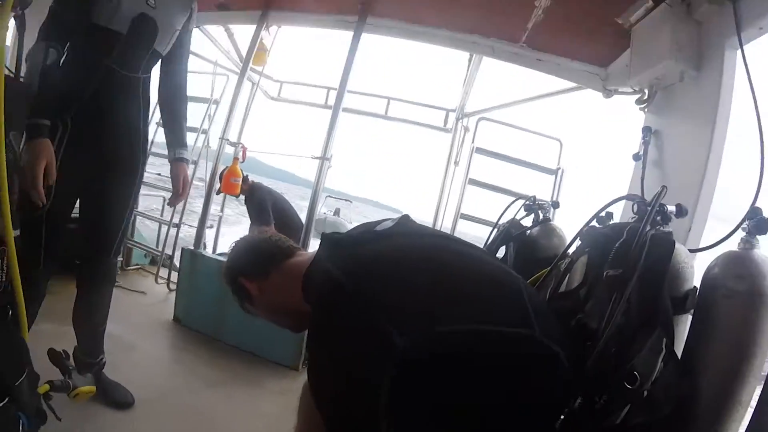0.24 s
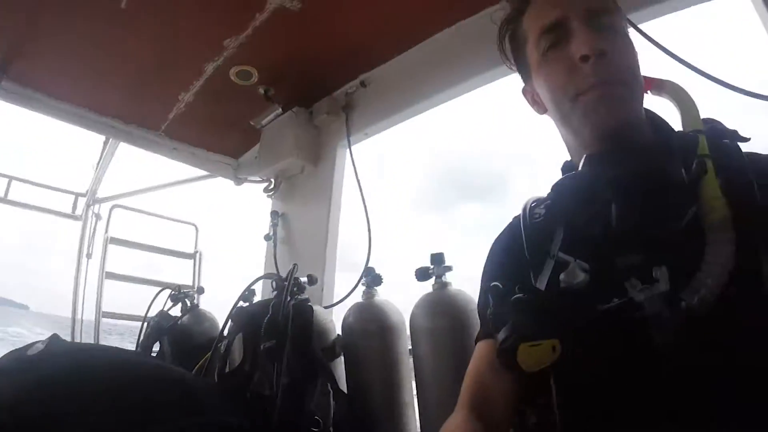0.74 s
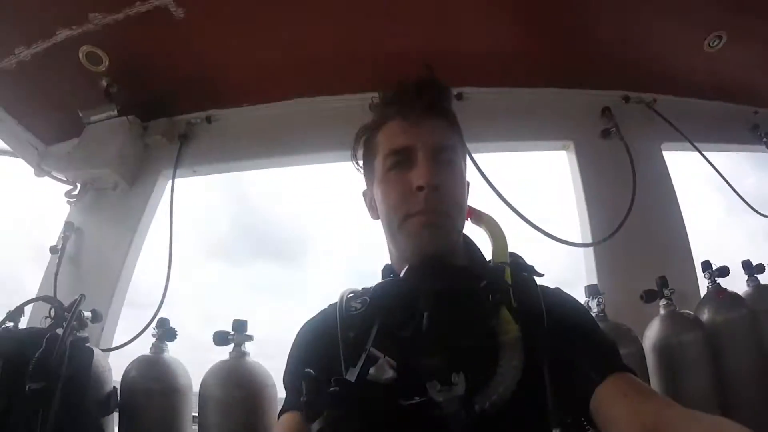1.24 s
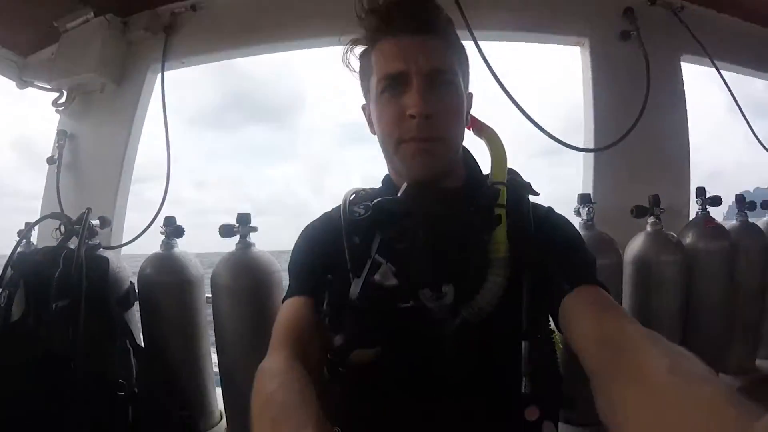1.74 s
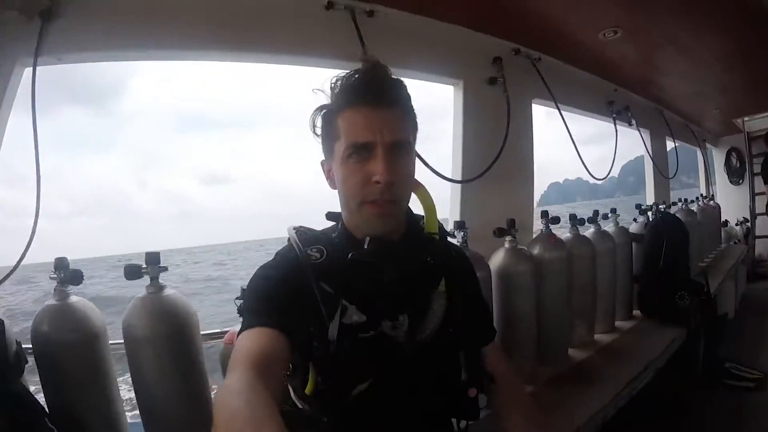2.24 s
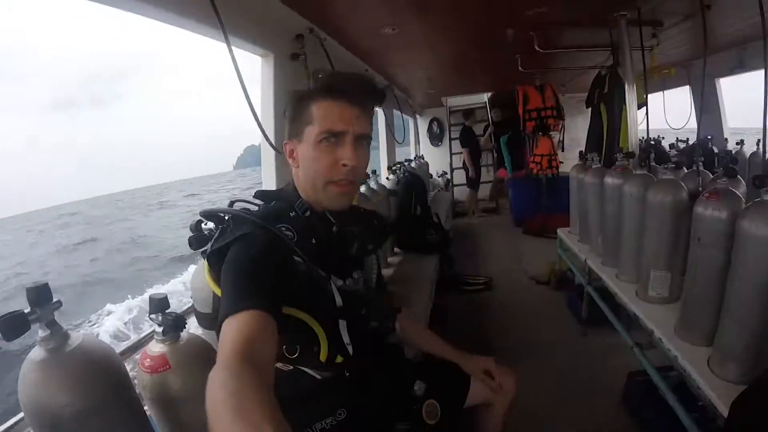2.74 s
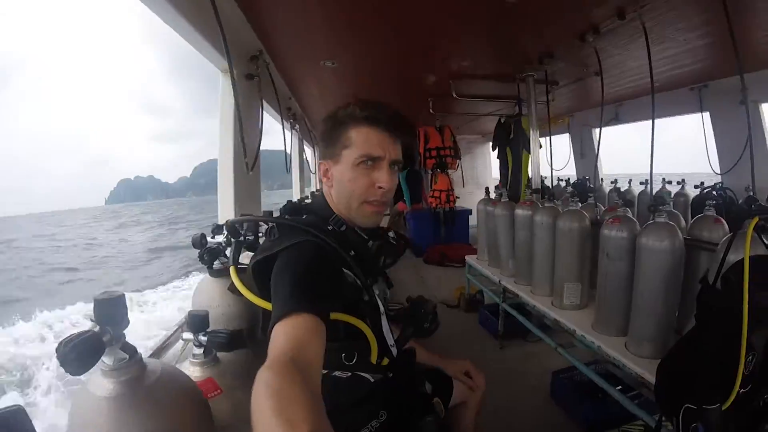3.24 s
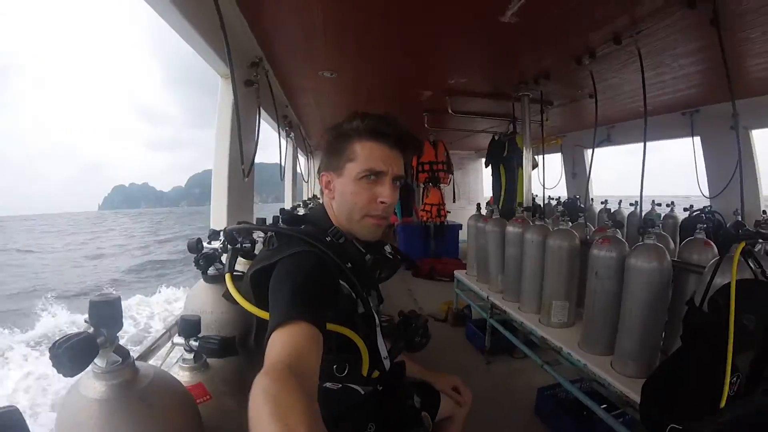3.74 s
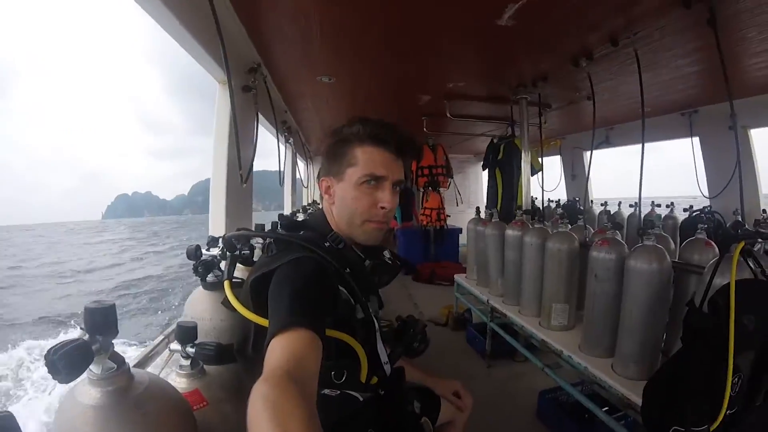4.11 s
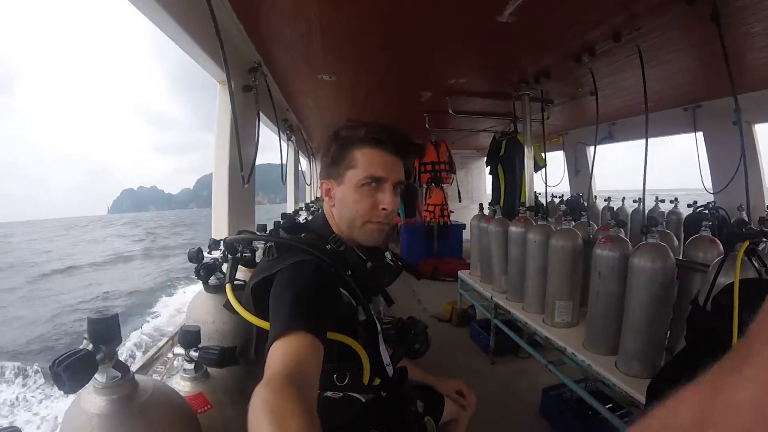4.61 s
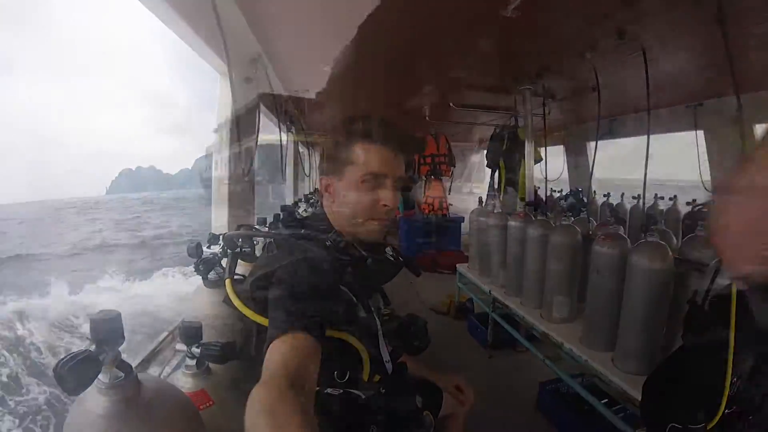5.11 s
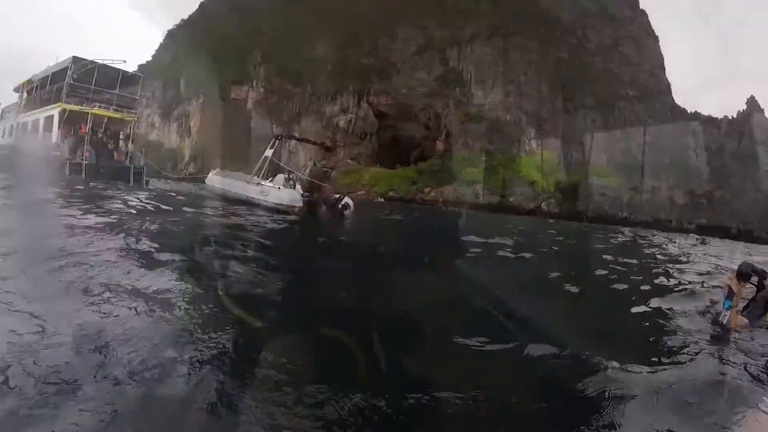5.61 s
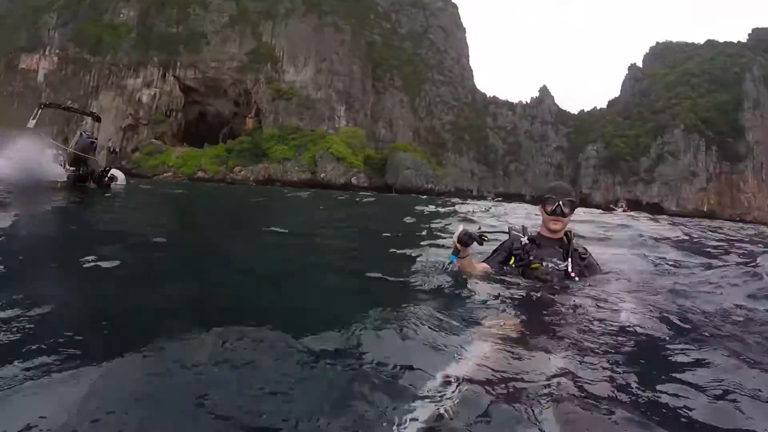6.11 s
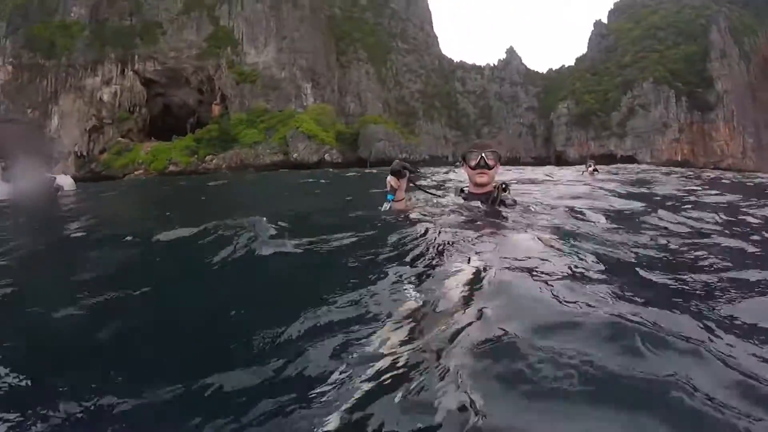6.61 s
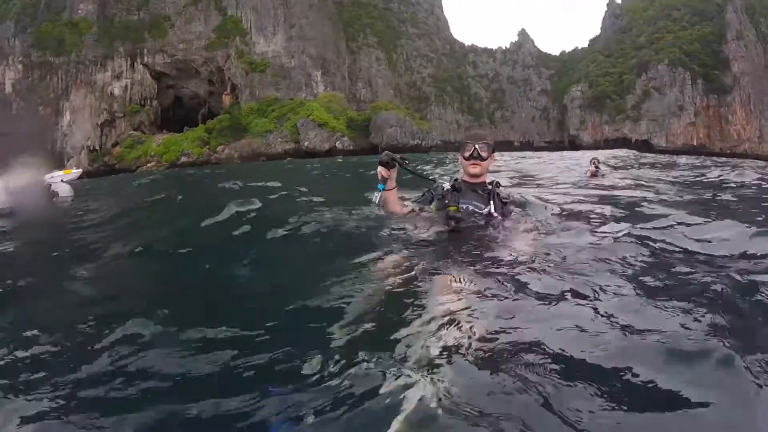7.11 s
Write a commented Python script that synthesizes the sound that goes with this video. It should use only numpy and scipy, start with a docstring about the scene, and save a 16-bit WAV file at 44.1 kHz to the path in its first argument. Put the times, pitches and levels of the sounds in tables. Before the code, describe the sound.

Muffled, close perspective from inside a sealed camera housing. Engine and propeller hum beat together with boomy hull vibration, clatter and foamy hiss. Loud low handling bumps, dry creaks, snaps and skin rubbing dominate early on, pushing the boat down in level. Afterwards the engine swells back, wavering, with soft knocks and a brief spray wash. It dissolves into a much quieter calm sea, with light fizzing ripples, low sloshes, tiny bubbles and plops.

```python
"""On the deck of a dive boat under way, heard from inside a camera's waterproof case.
Harmonics of the diesel and the propeller beat together, hull and panels shake in step with the shaft,
and the wake hisses as grainy filtered noise. A hand shifts its grip on the case: dull pushes, damped clicks
and snaps, rubbing noise and sticky pressure steps. The boat fades away and the camera floats on a calm sea,
where ripples and laps are swelling noise, and drips and bubbles are damped rings of rising pitch."""
import sys
import numpy as np
from scipy import signal
from scipy.fft import rfft, irfft, next_fast_len
from scipy.io import wavfile
from scipy.ndimage import map_coordinates

SR = 44100
rng = np.random.default_rng(int(sys.argv[2]) if len(sys.argv) > 2 else 0)


def dump_mix(stems):
    """Bounce the given channels to the path in sys.argv[1] as a 16-bit WAV at rate SR."""
    frames = np.atleast_2d(stems).T  # one column per channel
    limited = np.clip(frames, -1, 1)  # hard clip at full scale
    pcm = np.round(limited * 32767).astype(np.int16)
    wavfile.write(sys.argv[1], SR, pcm)


N = 324135
T = np.arange(N) / SR


def amp(db):
    """Decibels to gain."""
    return 10 ** (np.asarray(db) / 20)


def unit(x):
    """Scale to rms 1."""
    return x / np.sqrt(np.mean(x ** 2) + 1e-20)


def curve(rows):
    """A (time, value) table joined by straight lines, one value per sample."""
    return np.interp(T, *np.transpose(rows))


def wobble(rate):
    """A smooth random curve, rate knots a second."""
    return map_coordinates(rng.standard_normal(4096), [T * rate], mode="wrap")


def filtered(x, response):
    """x times a response of frequency."""
    m = next_fast_len(N + SR // 2)
    return irfft(rfft(x, m) * response(np.fft.rfftfreq(m, 1 / SR)), m)[:N]


def shaped(x, spectrum):
    """x through a (Hz, dB) spectrum, interpolated along log frequency."""
    f, db = np.transpose(spectrum)
    return filtered(x, lambda hz: amp(np.interp(np.log(hz + 1), np.log(f + 1), db)))


def coloured(x, spectrum):
    """x through a (Hz, dB) spectrum, at rms 1."""
    return unit(shaped(x, spectrum))


def noise(spectrum):
    """Fresh noise of that spectrum, at rms 1."""
    return coloured(rng.standard_normal(N), spectrum)


def grains(per_second):
    """Sparse impulses of random size, at rms 1."""
    return unit((rng.random(N) < per_second / SR) * rng.standard_normal(N))


def swell(s, half):
    """A bell-shaped stroke round time s."""
    return np.exp(-.5 * ((T - s) / half) ** 2)


def held(start, end, rise, release):
    """Rise from start, hold until end, release."""
    return np.clip(np.minimum((T - start) / rise, 1 - (T - end) / release), 0, 1)


def add(track, s, sound):
    """Mix a sound into the track at time s."""
    part = track[max(round(s * SR), 0):][:len(sound)]
    part += sound[:len(part)]


def rings(rows, attack, glide, dull_hz=5500):
    """Damped rings (s, peak dB, start Hz, t60, share of dull noise); attack in cycles, glide raises the pitch."""
    track, t = np.zeros(N), np.arange(SR // 4) / SR
    for s, db, hz, t60, crack in rows:
        fade = amp(-60 * t / t60)
        ring = np.sin(2 * np.pi * hz * t * (1 + glide * t / t60))
        dull = signal.butter(3, min(2.2 * hz, dull_hz), fs=SR)
        burst = unit(signal.lfilter(*dull, rng.standard_normal(len(t))))
        sound = (ring + crack * burst) * fade * (1 - np.exp(-t * hz / attack))
        add(track, s, amp(db) * sound / np.abs(sound).max())
    return track


def lines(turns, orders, low_db, high_db, waver_db):
    """Harmonics of a rotation (multiples 1-3 on low_db, the rest on high_db), wavering as the deck's echoes shift."""
    tone = np.zeros(N)
    for k, db in orders:
        level = high_db if k > 3.5 else low_db
        waver = waver_db * np.log(k) * (1.1 * wobble(3.08) + wobble(15))
        phase = k * turns + (k > 2) * rng.random()
        tone += np.sqrt(2) * amp(level + db + waver) * np.cos(2 * np.pi * phase)
    return tone


def shaken(shaft, spectrum, loose_db):
    """The same jolts return on every turn of the shaft: a comb of close lines, plus loose rattle."""
    jolts = map_coordinates(rng.standard_normal(2048), [shaft % 1 * 2048], mode="grid-wrap")
    return unit(coloured(jolts, spectrum) + amp(loose_db) * noise(spectrum))


FADE_END_S, FADE_S, FADE_POWER = 5.867, 0.81, 0.78


def under_way():
    """Gain of the boat as it fades into the calm sea."""
    return np.clip((FADE_END_S - T) / FADE_S, 0, 1) ** FADE_POWER


DIP_S, DIP_END_S, DIP_FALL_S, DIP_RETURN_S = 1.105, 1.95, 0.054, 0.66


def gripped():
    """1 while the hand holds the case tightly."""
    return held(DIP_S, DIP_END_S, DIP_FALL_S, DIP_RETURN_S)


# the boat sounds fainter during the tight grip, its bass fainter still
DIP_DB, DIP_BASS_DB = -11.5, -1.5
# the engine's firing rate as the boat runs: [time_s, rate_hz]
FIRING_RATE = [(0, 59.3), (2.3, 58.7), (4.2, 58.5)]


def boat():
    """Engine, propeller, hull and wake run off one rotation, dip with the tight grip and fade away."""
    firings = np.cumsum(curve(FIRING_RATE) * (1 + 0.001638 * wobble(8))) / SR
    # firing and blade tones swell when they fall into step, as they do here
    firings -= np.interp(4.14, T, firings)
    shaft = firings * 2 / 15  # two turns in 15 firings
    blades = 7 * shaft
    bass = engine(firings) + propeller(blades) + hull(shaft, firings) + panels(shaft) + knocks()
    bass *= amp(DIP_BASS_DB * gripped())
    treble = wake(firings) + clatter(shaft) + whine(shaft) + bow_wave()
    return (bass + treble) * amp(DIP_DB * gripped()) * under_way()


# exhaust tones: [multiple of the firing rate, level_db on top of the low curve, or of the high one from 4 up]
FIRING_TONES = [(1, -1), (2, -10), (4, -6.5), (5, -17.5), (6, -23), (7, -30.5), (9, -31.5)]
# standing waves favour different firing tones from moment to moment, here the lowest: [time_s, level_db]
FIRING_LOW_LEVEL = [(0, -24), (.9, -26.5), (2.85, -24.5), (3.3, -27.5), (5.1, -26)]
# the same for the third firing tone: [time_s, level_db]
FIRING_THIRD_LEVEL = [(0, -30), (.5, -33.5), (1.0, -37.5), (2.15, -40), (2.45, -34), (2.8, -31.5),
                      (3.1, -41), (3.6, -36), (4.2, -35), (4.7, -35.5), (5.1, -44), (5.6, -35.5)]
# the same for the firing tones from the fourth up: [time_s, level_db]
FIRING_HIGH_LEVEL = [(0, -35), (.9, -40), (3.1, -43.5), (3.4, -29), (3.75, -27), (4.05, -36.5), (4.4, -25),
                     (5, -29.5)]


def engine(firings):
    """The diesel sounds harmonics of its firing rate; no two firings are equally strong."""
    uneven = amp(1.1 * wobble(24) + 1.2 * wobble(55))
    third = np.sqrt(2) * amp(curve(FIRING_THIRD_LEVEL)) * np.cos(2 * np.pi * 3 * firings)
    low_db, high_db = curve(FIRING_LOW_LEVEL), curve(FIRING_HIGH_LEVEL)
    return uneven * (third + lines(firings, FIRING_TONES, low_db, high_db, waver_db=1.0))


THROB_DB = -8.5  # lowest blade tone, relative to the low firing curve
# propeller tones: [multiple of the blade rate, level_db on top of the low curve, or of the high one from 4 up]
BLADE_TONES = [(2, 0), (3, -25.5), (4, -12.5), (5, -7), (6, -17.5), (7, -19), (8, -33)]
# standing waves on the second and third blade tones: [time_s, level_db]
BLADES_LOW_LEVEL = [(0, -43), (2.5, -36), (3.75, -33), (4.1, -23), (5, -27.5)]
# standing waves on the blade tones from the fourth up: [time_s, level_db]
BLADES_HIGH_LEVEL = [(0, -54), (2.3, -40), (2.65, -31), (3.05, -26), (3.35, -36), (3.7, -43), (4.15, -42),
                     (4.35, -32.5), (5.1, -30)]


def propeller(blades):
    """Blade harmonics; the lowest lies just under the firing tone and beats with it four times a second."""
    low_db, high_db = curve(BLADES_LOW_LEVEL), curve(BLADES_HIGH_LEVEL)
    upper = amp(0.58 * wobble(12)) * lines(blades, BLADE_TONES, low_db, high_db, waver_db=0.84)
    throb_db = curve(FIRING_LOW_LEVEL) + THROB_DB
    return upper + amp(throb_db) * np.sqrt(2) * np.cos(2 * np.pi * blades)


BOOM_DB, DRONE_DB = -35, -53  # steady levels under way
# the hull surges as it meets a wave: [middle_s, half_length_s, boom_db, panel_drone_db]
SURGES = [(0.32, 0.12, -38.5, -42.5), (3.052, 0.17, -43, -50), (3.228, 0.041, -49, -39.5),
          (4.466, 0.25, -43, -64), (5.083, 0.24, -40, -52.5)]
# colour of the hull's boom: [freq_hz, level_db per Hz]
BOOM_SPECTRUM = [(10, -29), (25, -17), (45, 7.5), (80, 7.5), (140, 7.5), (205, 1.5), (255, 7), (305, 4.5),
                 (340, -3.5), (400, -17), (700, -59), (1500, -120)]


def hull(shaft, firings):
    """The hull booms in step with the shaft, flutters with each firing and surges on the waves."""
    boom = amp(BOOM_DB) + sum(amp(db) * swell(s, half) for s, half, db, _ in SURGES)
    flutter = amp(1.0 * wobble(7) + 2 * wobble(30) + 2.5 * np.cos(2 * np.pi * firings))
    return boom * flutter * shaken(shaft, BOOM_SPECTRUM, loose_db=-1.5)


# colour of the panels' drone: [freq_hz, level_db per Hz]
PANEL_SPECTRUM = [(100, -61.5), (280, -7.5), (350, -1), (410, 7.5), (450, -8.5), (520, -3), (620, -5.5),
                  (800, -28), (1500, -53), (3000, -120)]


def panels(shaft):
    """Panels drone over the boom, shaken by the shaft and mostly loose rattle."""
    drone = amp(DRONE_DB) + sum(amp(db) * swell(s, half) for s, half, _, db in SURGES)
    return drone * amp(1.4 * wobble(14)) * shaken(shaft, PANEL_SPECTRUM, loose_db=7.5)


WAKE_DB = -43
# colour of the wake's foam: [freq_hz, level_db per Hz]
FOAM_SPECTRUM = [(150, -20.5), (450, 3), (750, 1), (1350, -1), (1600, -3.5), (1810, -4), (1950, -12),
                 (2400, -7.5), (2950, -9), (3300, -2), (3550, -3.5), (3900, -5.5), (4300, -16.5),
                 (5100, -16.5), (7700, -26), (8600, -32.5), (11800, -40.5), (15000, -60.5)]


def wake(firings):
    """Foam bursts in grains over a steady hiss that pulses faintly once a firing."""
    foam = coloured(rng.standard_normal(N) + 0.23 * grains(900), FOAM_SPECTRUM)
    pulse = 1 + 0.043 * np.cos(2 * np.pi * firings)
    return amp(WAKE_DB + 1.02 * wobble(14)) * foam * pulse


CLATTER_DB = -50
# colour of the diesel's clatter: [freq_hz, level_db per Hz]
CLATTER_SPECTRUM = [(500, -6), (930, -2.5), (1350, 8), (1600, -6.5), (1780, 1.5), (1980, -18.5),
                    (2600, -6.5), (3050, -4), (3280, 5.5), (3420, -3.5), (3540, -19), (3780, -3),
                    (4300, -17.5), (5500, -23), (6300, -21), (7400, -22), (8500, -47)]


def clatter(shaft):
    """The diesel clatters with nearly the same jolts on every turn of the shaft."""
    return amp(CLATTER_DB) * shaken(shaft, CLATTER_SPECTRUM, loose_db=-15)


# gears sing: [multiple of the shaft rate, level_db]
GEAR_TONES = [(63, -58), (119.5, -58), (422.5, -60)]


def whine(shaft):
    """Gear tones follow the shaft with a slight jitter and a wavering level."""
    tone = np.zeros(N)
    for k, db in GEAR_TONES:
        turns = shaft + .0006 * wobble(45)
        tone += amp(db + 2.5 * wobble(12)) * np.cos(2 * np.pi * k * turns)
    return tone


SQUEEZE_RISE_S, SQUEEZE_RELEASE_S = 0.024, 0.053
ROCK_HZ, ROCK_WANDER, FLEX_SHARE = 13.5, .25, 0.31  # rocking rate, its drift, share of irregular flexing
LET_GO_S, LET_GO_HALF_S, LET_GO_DB = 2.045, 0.028, -14  # one slow swell as the hand lets go
SWAY_BOAT_DB, SWAY_SEA_DB = -29, -31.5  # slow pressure from wind and from swell
# the hand squeezes the case: [start_s, length_s, level_db rms]
SQUEEZES = [(0.665, 0.33, -24), (0.968, 0.25, -20.5), (1.293, 0.36, -13.5), (1.7, 0.29, -13)]
# colour of slow pressure on the wall: [freq_hz, level_db per Hz]
FLEX_SPECTRUM = [(2, -61), (5, 3.5), (9, 11), (13, 10.5), (22, 6.5), (35, -2), (60, -28), (120, -48.5),
                 (300, -73.5), (900, -120)]


def case_flex():
    """The hand rocks the wall of the case and lets it relax; wind and swell press slowly on it."""
    hand = np.zeros(N)
    for s, length, db in SQUEEZES:
        hand += amp(db) * held(s, s + length, SQUEEZE_RISE_S, SQUEEZE_RELEASE_S)
    rocks = np.cumsum(ROCK_HZ * np.exp(ROCK_WANDER * wobble(11))) / SR
    rocking = unit(np.sin(2 * np.pi * rocks) + FLEX_SHARE * noise(FLEX_SPECTRUM))
    wind = amp(SWAY_BOAT_DB + DIP_DB * gripped()) * under_way()
    sea_swell = amp(SWAY_SEA_DB) * (1 - under_way())
    let_go = amp(LET_GO_DB) * swell(LET_GO_S, LET_GO_HALF_S)
    return hand * rocking + let_go + (wind + sea_swell) * noise(FLEX_SPECTRUM)


KNOCK_T60_S, KNOCK_THUD = 0.045, .06  # ring time, share of noise
# the hull knocks under way: [start_s, peak_db, pitch_hz]
KNOCKS = [(.471, -23, 299), (2.938, -32, 344), (3.027, -24, 276), (3.119, -27.5, 354), (3.3, -22.5, 268),
          (3.395, -19, 254), (4.398, -25, 275)]


def knocks():
    """Each knock on the hull is a short damped ring with a little thud in it."""
    return rings([(*knock, KNOCK_T60_S, KNOCK_THUD) for knock in KNOCKS], attack=0.59, glide=0)


SPRING_BACK = 3.3  # the wall springs back this many times more slowly than it gives
# fingers bump the case: [middle_s, peak_db, half_width_s]
BUMPS = [(0.496, -3, 0.0014), (0.503, -7.5, 0.0037), (0.513, -17, 0.0055), (.680, -11, 0.0012),
         (0.692, -11.5, 0.0011), (.762, -9.5, 0.0034), (0.785, -9, 0.0013), (.803, -18, 0.00076),
         (1.029, -12.5, 0.0011), (1.040, -20, 0.00054), (1.048, -4.5, 0.0039), (1.061, -20.5, .0009),
         (1.073, -18, .001), (1.116, -6, 0.0016), (1.122, -10.5, 0.0013), (1.131, -5.5, 0.0023),
         (1.159, -7.5, 0.0012), (1.189, -5.5, 0.0021), (1.304, -11, 0.0026), (1.374, -11, 0.007),
         (1.467, -16.5, 0.00091), (1.471, -10, 0.0033), (1.63, -7.5, 0.0051), (1.791, -16, 0.0032),
         (1.858, -15, 0.0025), (1.893, -8.5, 0.0089), (1.979, -10.5, 0.0017), (1.999, -18, 0.00057),
         (2.025, -15, 0.0011)]


def bumps():
    """Each bump is one dull push: the wall gives and springs back without ringing."""
    track, t = np.zeros(N), np.arange(-SR // 10, SR // 10) / SR
    for s, db, half in BUMPS:
        give = np.exp(-.5 * (t / half) ** 2)
        rebound = np.exp(-.5 * (t / half / SPRING_BACK) ** 2) / SPRING_BACK
        push = give - rebound
        add(track, s + t[0], amp(db) * push / push.max())
    return track


CREAK_GRIT_DB, CREAK_GRIT_S = -14, 0.0061  # gritty tail: level under the click's peak, decay time
# the mount gives with dry clicks: [start_s, peak_db, brightness_db per octave]
CREAKS = [(0.6785, -22, -3), (0.6908, -21.5, -3), (0.782, -18, -1), (0.8014, -21, -8), (0.8175, -24, -6),
          (0.9187, -24, 16), (1.05, -25, 2), (1.156, -30, 0), (1.431, -19.5, -6.5)]
# the mount's ringing modes before each click's own brightness and scatter: [pitch_hz, level_db, t60_s]
MOUNT_MODES = [(786, 0, 0.0084), (1510, 1, .009), (2210, 1, 0.0069), (3230, -2, 0.0078)]
# colour of the grit: [freq_hz, level_db per Hz]
GRIT_SPECTRUM = [(200, -9), (600, 22), (1300, 10), (1900, 8), (2600, 10), (3500, 7), (4300, -20),
                 (5500, -26), (8000, -54), (15000, -63)]


def mount():
    """Each click of the mount rings its modes in a new balance and trails a gritty tail."""
    clicks, grit, t = np.zeros(N), np.zeros(N), np.arange(SR // 10) / SR
    for s, db, bright in CREAKS:
        ring = np.zeros(len(t))
        for k, (hz, level, t60) in enumerate(MOUNT_MODES):
            fade = amp(level + bright * np.log2(hz) + rng.normal(0, 2) - 60 * t / t60)
            pitch_hz = hz * (1 + 0.045 * rng.standard_normal())
            ring += (-1) ** k * fade * np.sin(2 * np.pi * pitch_hz * t)
        ring *= (1 - np.exp(-t / 0.00024)) ** 2
        add(clicks, s, amp(db) * ring / np.abs(ring).max())
        add(grit, s, amp(db + CREAK_GRIT_DB) * np.exp(-t / CREAK_GRIT_S))
    return clicks + grit * noise(GRIT_SPECTRUM)


RUB_RISE_S = 0.0026
# skin rubs the case, fading over the second half of length_s: [start_s, length_s, level_db rms]
RUBS = [(0.798, 0.0028, -59), (0.917, 0.0056, -43.5), (1.013, 0.049, -41.5), (1.037, 0.0099, -29),
        (1.281, .008, -44.5), (1.369, 0.0089, -45.5), (1.429, 0.0061, -39), (1.456, 0.025, -51),
        (1.468, 0.0057, -37.5), (1.49, 0.052, -62), (1.588, 0.013, -48.5), (1.628, 0.0077, -47.5),
        (1.888, 0.0056, -44), (1.935, 0.044, -45.5), (1.985, 0.013, -40), (2.02, 0.0054, -35.5)]
# colour of skin rubbing: [freq_hz, level_db per Hz]
SKIN_SPECTRUM = [(200, -16), (700, 13), (1500, 6.5), (2200, 9.5), (3400, 8), (4400, -3), (6600, 0),
                 (8500, -12.5), (12000, -23.5), (15000, -27)]


def rubs():
    """Skin rubs the case: dense grains that swell and fade with the contact."""
    contact = np.zeros(N)
    for s, length, db in RUBS:
        contact += amp(db) * held(s, s + length / 2, RUB_RISE_S, length / 2)
    return contact * coloured(grains(4000), SKIN_SPECTRUM)


# the case snaps: [start_s, peak_db, pitch_hz, t60_s]
SNAPS = [(1.030, -33, 6320, .02), (1.039, -26, 6150, 0.018), (1.040, -25, 3440, 0.042),
         (1.04, -26, 1715, .025), (1.042, -23.5, 2420, 0.018), (1.041, -32, 834, 0.044),
         (1.053, -38, 5000, 0.043), (1.111, -41, 5030, .018), (1.155, -27.5, 1930, 0.0072),
         (1.9968, -20, 1340, 0.013), (1.997, -26, 3160, 0.0082), (2.0235, -36, 5030, .012),
         (2.025, -28, 2470, .012), (2.030, -19.5, 1980, 0.012)]


def snaps():
    """The case snaps: short damped rings cracked open with dull noise."""
    share_of_noise = 0.41
    return rings([(*snap, share_of_noise) for snap in SNAPS], attack=0.63, glide=0, dull_hz=3500)


SLIP_LEAK_S, SLIP_SHARP_SCATTER = 0.0045, .45  # how fast the pressure leaks away; spread of sharpness
CREEP_DB, CREEP_SCATTER_DB = -34.5, 8.5  # faint slips during the tight grip: middle level, spread either way
# sticky skin lets go with a tick: [start_s, level_db of the step before its edge is rounded]
SLIPS = [(1.113, -21.5), (1.161, -26.5), (1.173, -27.5), (1.191, -33), (1.301, -30.5), (1.305, -27),
         (1.318, -27), (1.375, -26), (1.389, -32), (1.394, -26), (1.467, -28), (1.472, -27.5),
         (1.474, -17.5), (1.480, -21), (1.484, -28.5), (1.492, -24.5), (1.501, -22), (1.507, -30),
         (1.515, -34), (1.601, -21), (1.617, -23.5), (1.758, -27), (1.8592, -17), (1.866, -25),
         (1.873, -20.5), (1.877, -19.5), (1.9514, -24.5), (1.961, -26), (1.9772, -16), (1.982, -23),
         (1.9887, -19), (1.992, -22), (2.006, -20.5), (2.017, -24)]


def slips():
    """Sticky skin lets go in single slips, each a pressure step that leaks away."""
    steps, t = np.zeros(N), np.arange(SR // 10) / SR
    creep = []
    for when, size in rng.random((24, 2)):
        creep.append((DIP_S + (DIP_END_S - DIP_S) * when, CREEP_DB + CREEP_SCATTER_DB * (2 * size - 1)))
    for s, db in SLIPS + creep:
        # a larger patch of skin takes longer to let go, and no two are equally sharp
        rise = (.00002 + 0.00016 * amp(db)) * np.exp(SLIP_SHARP_SCATTER * rng.standard_normal())
        add(steps, s, amp(db) * np.exp(-t / SLIP_LEAK_S) * (1 - np.exp(-t / rise)))
    return filtered(steps, lambda hz: 1 / (1 + 1j * hz / 10000) ** 2)


SQUEAK_S, SQUEAK_HALF_S, SQUEAK_DB = 1.78, .04, -53.5
# colour of a fingertip squeaking on plastic: [freq_hz, level_db per Hz]
SQUEAK_SPECTRUM = [(1000, -56), (1480, -33), (1530, -1), (1590, -18), (3450, -26), (3680, -1.5),
                   (3850, -33), (5000, -22), (5200, -20), (5500, -30), (9000, -49.5)]


def squeak():
    """A fingertip squeaks on the case: one swell of noise in narrow bands."""
    return amp(SQUEAK_DB) * swell(SQUEAK_S, SQUEAK_HALF_S) * noise(SQUEAK_SPECTRUM)


# the bow wave breaks alongside: [middle_s, half_length_s, level_db rms]
BREAKERS = [(3.504, 0.055, -42.5), (4.748, 0.058, -52)]
# colour of its spray: [freq_hz, level_db per Hz]
SPRAY_SPECTRUM = [(400, -23), (750, 0), (950, -2.5), (1400, 1.5), (1900, -17), (3300, -10), (4500, -25),
                  (12000, -49.5)]


def bow_wave():
    """The bow wave breaks alongside in short swells of spray noise."""
    return sum(amp(db) * swell(s, half) for s, half, db in BREAKERS) * noise(SPRAY_SPECTRUM)


def sea():
    """Water round the floating case rises as the boat fades; bubbles and drips come through the case."""
    water = ripples() + laps() + fizzes() + gulps()
    return water * (1 - under_way()) + shaped(bubbles() + drips(), WATER_TONE)


RIPPLE_DB = -53.5
# colour of the ripples: [freq_hz, level_db per Hz]
RIPPLE_SPECTRUM = [(150, 10), (350, 4), (700, 0), (1200, 2), (1650, -3), (1950, -8.5), (2600, 0),
                   (3200, -10), (3600, -5), (4150, -16), (5000, -13.5), (7500, -22), (12000, -32),
                   (15000, -59)]


def ripples():
    """Ripples fizz round the case: flickering noise with sparse grains."""
    flicker = amp(1.3 * wobble(25) + 1.1 * wobble(80))
    fizz = coloured(rng.standard_normal(N) + 0.42 * grains(250), RIPPLE_SPECTRUM)
    return amp(RIPPLE_DB) * flicker * fizz


SLOSH_DB = -48.5  # steady slosh between laps
# wavelets lap at the case: [middle_s, half_length_s, slosh_db, splash_db]
LAPS = [(5.644, 0.058, -52, -44), (5.971, .002, -58, -48), (6.102, 0.013, -62, -53),
        (6.19, 0.0062, -53, -53.5), (6.25, 0.0087, -63, -58), (6.346, 0.011, -42, -57.5),
        (6.469, .003, -52, -52), (6.52, .03, -50, -69), (6.891, 0.0076, -38, -57),
        (7.005, 0.0064, -42.5, -53.5), (7.0965, 0.00091, -56, -40.5), (7.225, 0.14, -54, -56.5)]
# colour of the slosh: [freq_hz, level_db per Hz]
SLOSH_SPECTRUM = [(15, -34), (40, -2.5), (70, 8.5), (110, -2), (160, -1), (200, -12.5), (240, -10.5),
                  (400, -23.5), (800, -87), (2000, -120)]
# colour of the splash: [freq_hz, level_db per Hz]
SPLASH_SPECTRUM = [(200, -2.5), (700, 3.5), (1250, 2.5), (1900, -20), (2700, -6), (3600, -4.5), (4200, -27),
                   (6000, -20), (12000, -42.5)]


def laps():
    """Low water sloshes all along, more with each lap, and every lap splashes in grains."""
    lap = sum(amp(db) * swell(s, half) for s, half, db, _ in LAPS)
    slosh = (amp(SLOSH_DB) + lap) * amp(2.4 * wobble(31)) * noise(SLOSH_SPECTRUM)
    splash = sum(amp(db) * swell(s, half) for s, half, _, db in LAPS)
    return slosh + splash * coloured(grains(900), SPLASH_SPECTRUM)


BUBBLE_DB, BUBBLE_SPREAD_DB = -52.5, 8  # the faintest, and how much louder the largest are, before WATER_TONE
BUBBLE_LOW_HZ, BUBBLE_HIGH_HZ, BUBBLE_T60_S = 650, 4600, .02
BUBBLE_SPLASH, BUBBLE_GLIDE = 0.59, 0.073  # share of noise; rise of the pitch
# how bubbles and drips come through the case: [freq_hz, level_db]
WATER_TONE = [(300, -4), (900, -3), (3700, 0), (4200, -12.5), (6000, -2), (9000, -27), (15000, -39)]


def bubbles():
    """Small bubbles scattered at random, each a damped ring of rising pitch with some splash."""
    when, size, pitch = rng.random(size=(260, 3)).T
    s = 5.6 + 1.75 * when
    db = BUBBLE_DB + BUBBLE_SPREAD_DB * size ** 2
    hz = BUBBLE_LOW_HZ * (BUBBLE_HIGH_HZ / BUBBLE_LOW_HZ) ** pitch
    t60, splash = np.full(len(s), BUBBLE_T60_S), np.full(len(s), BUBBLE_SPLASH)
    return rings(np.transpose([s, db, hz, t60, splash]), attack=0.95, glide=BUBBLE_GLIDE)


DRIP_CYCLES = 34  # cycles of the starting pitch until a drip has died away
# the loudest drips and plops: [start_s, peak_db before WATER_TONE, starting pitch_hz, share of splash]
DRIPS = [(5.63, -39, 725, .3), (5.713, -32, 2780, 0.63), (5.968, -30.5, 3190, 0.74), (5.994, -35, 2600, .4),
         (6.19, -41, 1660, .4), (6.245, -45, 2050, .5), (6.461, -38, 1160, 0.28), (6.856, -34, 860, .05),
         (6.870, -40, 1150, 0.23), (6.884, -40.5, 690, .1), (7.004, -38, 786, .3), (7.054, -45, 2650, .1),
         (7.0949, -24.5, 3450, 0.49), (7.128, -41, 3220, 0.59), (7.155, -42, 1360, .4),
         (7.192, -36, 760, .05), (7.238, -34.5, 2830, 0.92), (7.224, -41, 740, .4), (7.262, -37, 1230, .4),
         (7.272, -43, 690, .3), (7.305, -44, 1090, .4)]


def drips():
    """Drips and plops: damped rings of rising pitch, the higher ones shorter."""
    rows = [(s, db, hz, DRIP_CYCLES / hz, share) for s, db, hz, share in DRIPS]
    return rings(rows, attack=0.67, glide=0.13, dull_hz=3200)


# foam fizzes briefly on the case: [middle_s, half_length_s, level_db rms]
FIZZES = [(5.812, 0.007, -59), (6.11, 0.01, -55), (6.31, 0.033, -65.5), (6.483, .025, -72.5),
          (7.244, 0.021, -65)]
# colour of the fizz: [freq_hz, level_db per Hz]
FIZZ_SPECTRUM = [(1500, -27), (2900, 5.5), (4200, -8), (5200, 0), (6300, -4), (7200, -11), (12000, -30)]


def fizzes():
    """Foam fizzes briefly on the case in dense, bright grains."""
    return sum(amp(db) * swell(s, half) for s, half, db in FIZZES) * coloured(grains(2500), FIZZ_SPECTRUM)


GULP_S, GULP_DB = 6.83, -48
# colour of the gulping water: [freq_hz, level_db per Hz]
GULP_SPECTRUM = [(40, -60), (125, -9.5), (170, 1), (215, -14), (300, -70), (500, -120)]


def gulps():
    """Water starts to gulp against the case: a low band of noise that stays to the end."""
    return amp(GULP_DB) * held(GULP_S, T[-1], 0.032, .1) * noise(GULP_SPECTRUM)


def scene():
    """Everything reaches the one microphone inside the case."""
    hand = bumps() + mount() + rubs() + snaps() + slips() + squeak()
    return (boat() + case_flex() + hand + sea())[None]


TOP_HZ = 15300


def record(dry):
    """The camera keeps nothing above its band limit."""
    return np.array([filtered(channel, lambda hz: hz < TOP_HZ) for channel in dry])


dry = scene()
out = record(dry)
dump_mix(out)
```